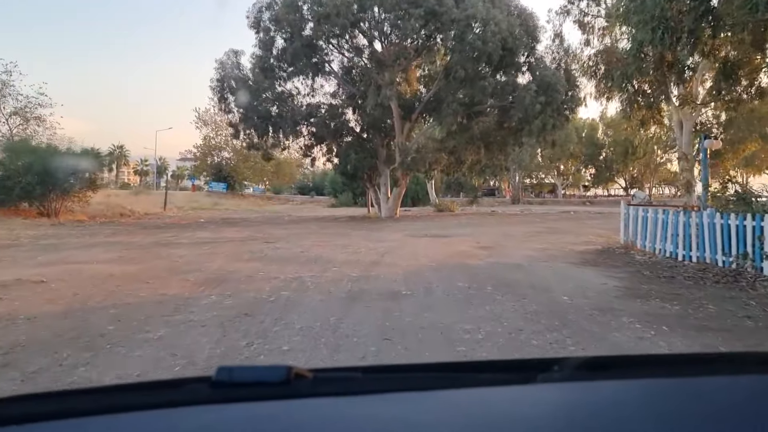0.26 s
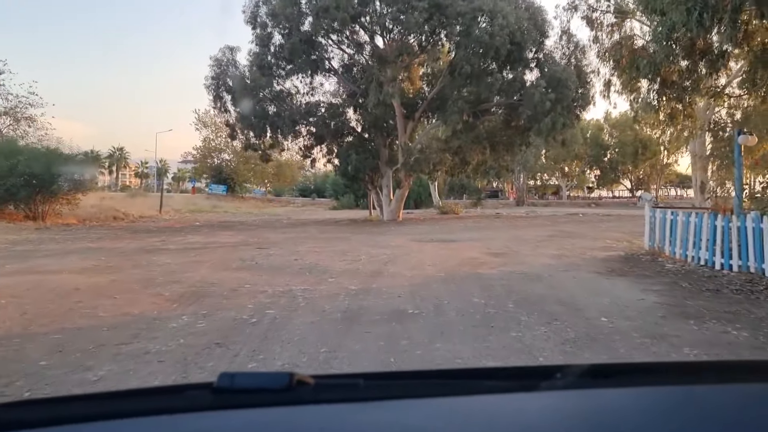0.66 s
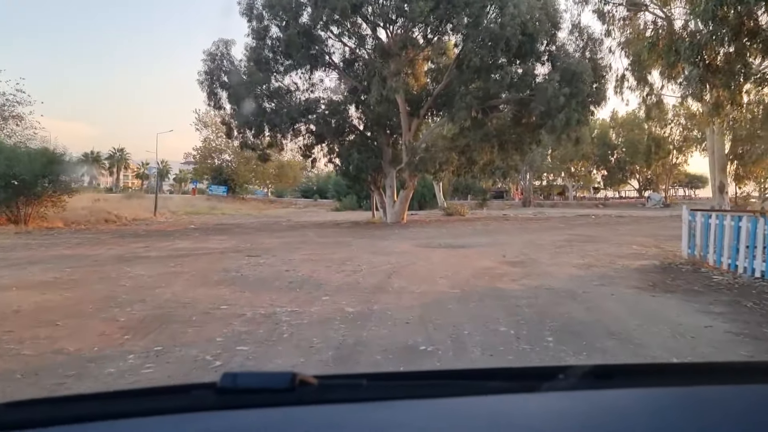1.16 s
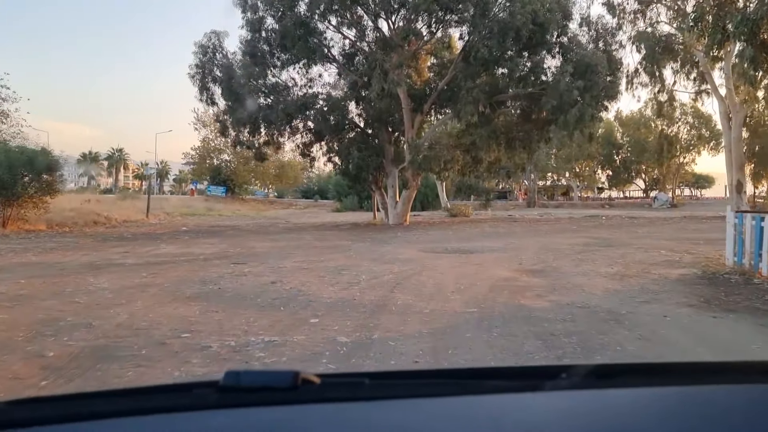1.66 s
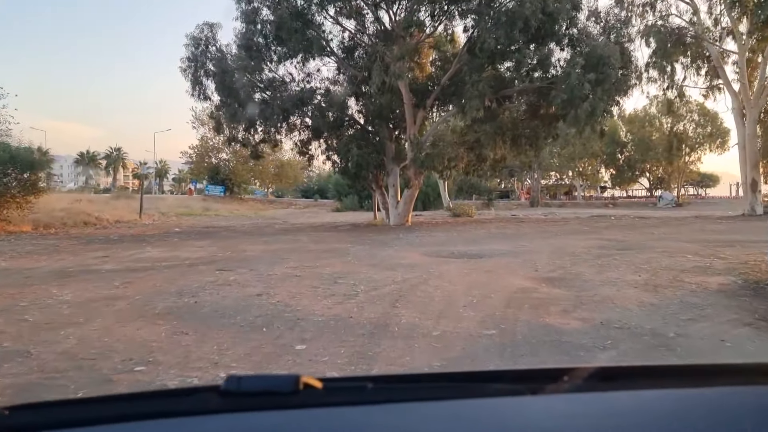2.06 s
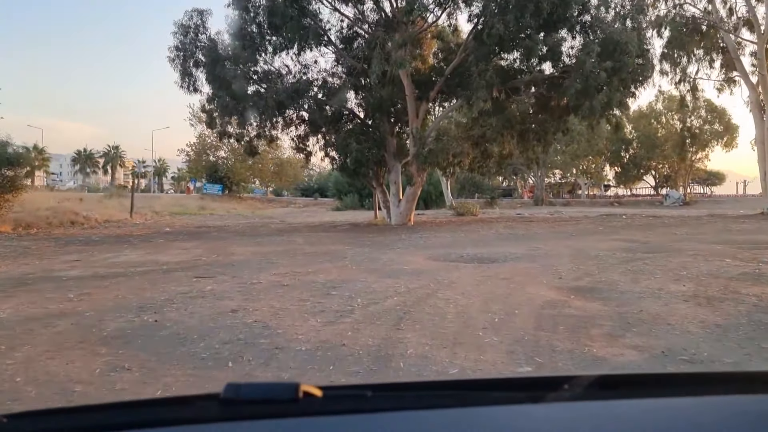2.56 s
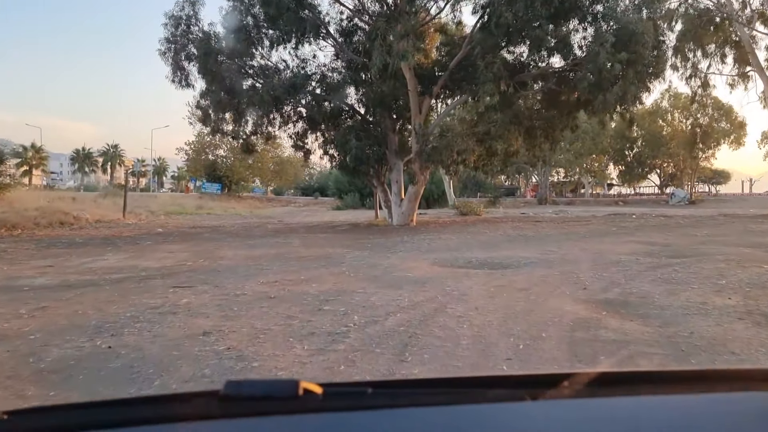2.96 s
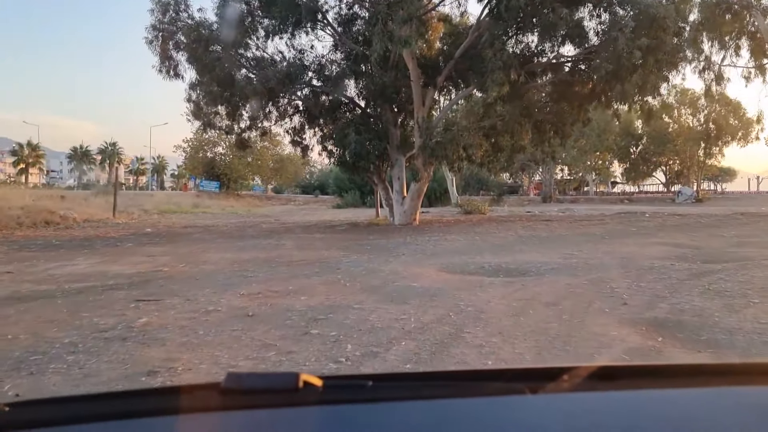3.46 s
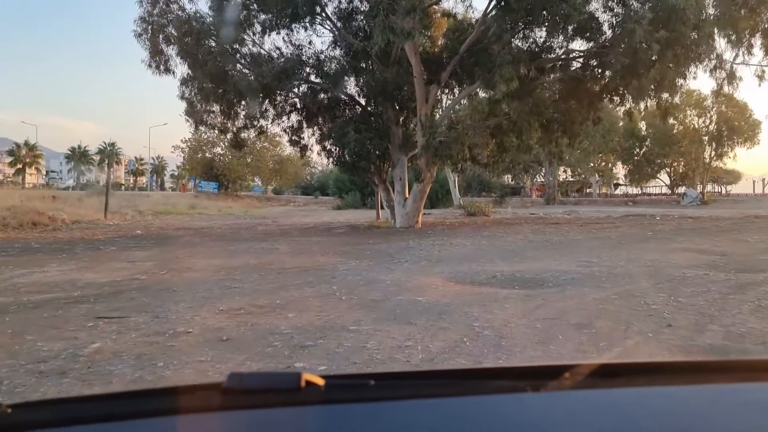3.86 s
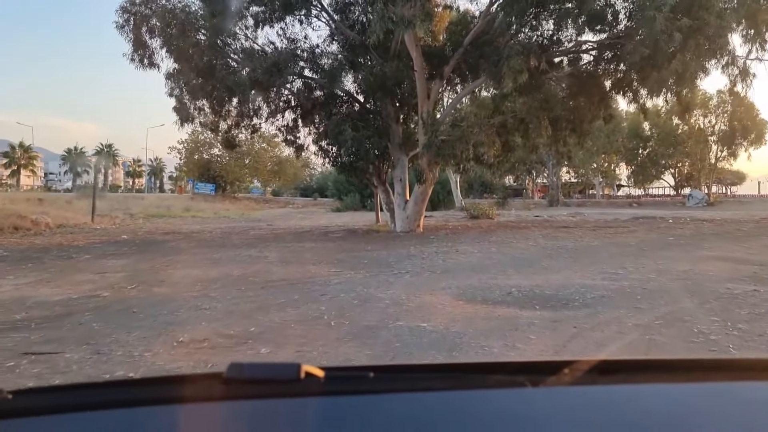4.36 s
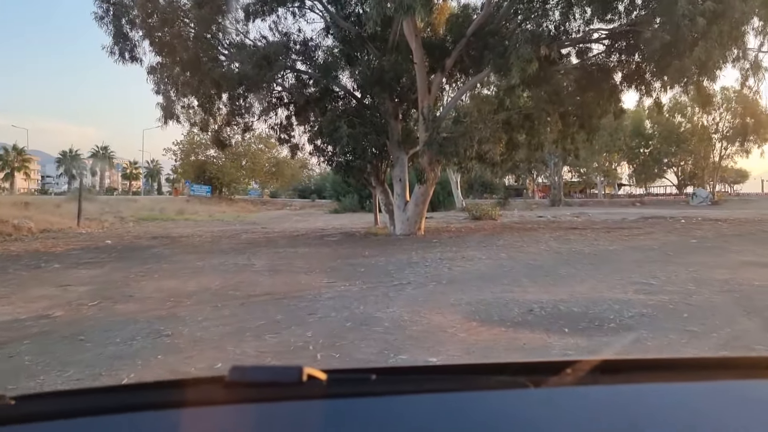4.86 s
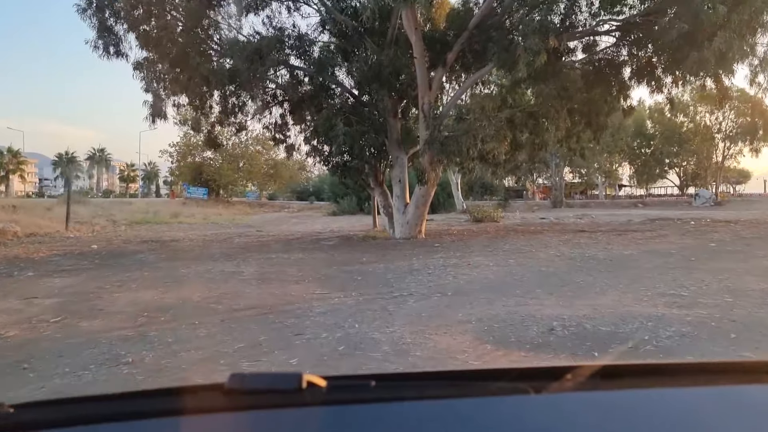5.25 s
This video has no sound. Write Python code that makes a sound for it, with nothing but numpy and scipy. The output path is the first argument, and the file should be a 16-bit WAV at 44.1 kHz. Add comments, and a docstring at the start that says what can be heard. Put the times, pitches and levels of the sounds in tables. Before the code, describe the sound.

Heard from the dashboard inside a slowly rolling car, low tyre rumble and uneven bassy booms run throughout. Stones knock and tick dully under the floor, densest in the first two seconds, with a sharp tick near 1.3 seconds and a firm knock near 3.1. Faint thin hums glide underneath later, while a soft hiss with grit swells towards the end.

```python
"""A small car rolls slowly over a stony lot, heard by a two-port microphone on the dashboard.
Bumps make three cabin resonances boom as wandering sines, and the tyres rumble through the body as shaped noise.
Stones knock and tick under the floor as cracks, rings and noisy tails; small stones and grit clink as short rings.
A faint hum glides as thin tones, and a hiss from the left, also shaped noise, grows towards the end."""
import sys
import numpy as np
from scipy import signal
from scipy.fft import rfft, irfft
from scipy.io import wavfile
from scipy.ndimage import uniform_filter1d

SR = 44100
rng = np.random.default_rng(int(sys.argv[2]) if len(sys.argv) > 2 else 0)


def to_wav(sig):
    """Store sig (one row per channel, or 1-D mono) as 16-bit WAV at the path in sys.argv[1].

    Samples outside -1..1 are clipped; the rate is SR.
    """
    pcm = np.clip(np.atleast_2d(sig), -1, 1) * 32767
    pcm = np.round(pcm).astype(np.int16)
    wavfile.write(sys.argv[1], SR, pcm.T)  # frames by channels


def voltage_ratio(level):
    """Linear amplitude factor for a level in decibels (scalar or array-like)."""
    return 10 ** (np.asarray(level, float) / 20)


N = 242726
TIME = np.arange(N) / SR


def evened(x):
    """Scales a signal to rms 1."""
    return x / np.sqrt(np.mean(x ** 2) + 1e-20)


def slow_random(count, span):
    """A random curve of rms 1, smoothed twice over span points."""
    once = uniform_filter1d(rng.standard_normal(count), span)
    return evened(uniform_filter1d(once, span))


def sides(pan_db):
    """Gains of the left and right port for a left-right difference in dB."""
    return voltage_ratio(np.array([[pan_db / 2], [-pan_db / 2]]))


def read(points, hz):
    """Reads a table over frequency at the frequencies hz."""
    f, value = np.transpose(points)
    return np.interp(np.log(hz + 1), np.log(f + 1), value)


def curves(rows, t):
    """Reads each column of a table over time at the times t."""
    s, *columns = np.transpose(rows)
    return [np.interp(t, s, column) for column in columns]


def modes(table, hz, order):
    """Strength over frequency of a set of resonances."""
    return np.sqrt(sum(voltage_ratio(db) ** 2 / (1 + (2 * (hz - f) / width) ** 2) ** order for f, width, db in table))


def rise(t, rise_s):
    """A soft start from 0 to 1."""
    return 1 - np.exp(-(t / rise_s) ** 2)


# peaks and dips of the cabin at each port: f/Hz, width/Hz, left level/dB, right level/dB
CABIN = [(79, 38, 0, 6), (221.8, 43, 6.5, 1.5), (338, 130, 4, 1), (1220, 150, -2, -4.5),
         (570.3, 130, 7, 7.5), (735, 45, 2.5, -4), (1010, 38, 6.5, 4), (1387, 280, 3, 5.5),
         (1800, 65, 5, 0), (1880, 670, 3, -0.5), (2410, 140, -5, 4), (2770, 110, -2.5, -3),
         (3220, 140, 4, -2), (4580, 310, 1.5, 1), (6700, 1500, 5, 2.5)]


def ports(hz, same, lead, balance):
    """Likeness, phase turn and gains of the two ports; the cabin colours each in its own way."""
    likeness = np.clip(read(same, hz), 0, 1)
    turn = np.exp(-1j * np.interp(hz, *np.transpose(lead)))
    left, right = voltage_ratio(read(balance, hz) / 2), voltage_ratio(-read(balance, hz) / 2)
    # what is left when the ports are summed
    mean = np.sqrt(left ** 2 + right ** 2 + 2 * likeness * turn.real) / 2
    peaks = np.array([np.exp(-(2 * (hz - f) / width) ** 2) for f, width, *_ in CABIN])
    left_db, right_db = np.transpose(CABIN)[2:] @ peaks
    left, right = left * voltage_ratio(left_db) / mean, right * voltage_ratio(right_db) / mean
    return likeness[:, None], turn[:, None], left[:, None], right[:, None]


def noise(shape_db, pair, patchy_db, flicker_db, size):
    """Stereo noise from random short-time spectra, with patches and a flicker shared by all pitches."""
    hop = size // 4
    hz, t = np.fft.rfftfreq(size, 1 / SR), np.arange(N // hop + 5) * hop / SR
    a, b, c, d, patches = rng.standard_normal((len(t), len(hz), 5)).T
    patches = uniform_filter1d(patches, size=size // 200, axis=0)
    patches = evened(uniform_filter1d(patches, size=32768 // size, axis=1))
    flicker = evened(uniform_filter1d(rng.standard_normal(len(t)), size=4))
    same, turn, left, right = ports(hz, *pair)
    shared, separate = a + 1j * b, c + 1j * d
    z = np.array([left * shared, right * turn * (same * shared + np.sqrt(1 - same ** 2) * separate)])
    z *= voltage_ratio(shape_db(hz[:, None], t) + patchy_db * patches + flicker_db * flicker)
    return signal.istft(z, nperseg=size, noverlap=size - hop)[1][:, :N]


def tone(hz, db, wander_hz, smooth_s):
    """A sine whose frequency wanders at random about the curve hz."""
    drift = slow_random(N, int(smooth_s * SR))
    turns = np.cumsum(hz + wander_hz * drift) / SR + rng.random()
    return np.sqrt(2) * voltage_ratio(db) * np.sin(2 * np.pi * turns)


# two faint gliding hums: t/s, f/Hz, level/dB
HUM_FALLING = [(2.25, 250.5, -46), (2.6, 246.5, -59), (2.9, 239.8, -52), (3.5, 229.8, -47),
               (4.0, 223.4, -54.5), (4.45, 222.4, -49)]
HUM_LEVEL = [(3.601, 248.7, -55.5), (4.303, 240.8, -52.5), (5.001, 246.9, -53), (5.5, 244.6, -55.5)]


def hums():
    """Two thin gliding tones that fade in and out."""
    out = 0
    for rows in (HUM_FALLING, HUM_LEVEL):
        on = np.clip(np.minimum(TIME - rows[0][0], rows[-1][0] - TIME) / 0.034, 0, 1)
        out = out + on * tone(*curves(rows, TIME), wander_hz=0.38, smooth_s=0.035)
    return out


# the hiss, before tilt and lifts change its strength:
# t/s, level/dB, brightness/dB per octave, lift near 6.4 kHz/dB
HISS = [(0.0, -58.5, -5.5, 2.5), (0.61, -61.5, -5.5, 0.5), (1.39, -56.5, 0, 1), (1.98, -57.5, -4, -3),
        (3.02, -52.5, 0, -3), (3.3, -54, -1, -2.5), (3.57, -53, -1, -3), (3.85, -51.5, .5, -2.5),
        (3.97, -48.5, 1, -8), (4.24, -47, -1, -4.5), (4.55, -47.5, -0.5, 4), (4.85, -47, -0.5, 1),
        (5.1, -46.5, 0, 6), (5.3, -47, 1.5, 3), (5.5, -43.5, 0, 7)]
# basic colour of the hiss: f/Hz, level per Hz/dB
HISS_COLOUR = [(240, -31.5), (450, -4.5), (900, -12), (1800, -12), (2600, -9.5), (4100, -17), (4600, -27),
               (6500, -33.5), (7600, -33.5), (8700, -46), (11300, -60.5), (19200, -120)]
# a band of the hiss that stands out and moves: t/s, centre f/Hz, half width/octaves, lift/dB
HISS_BAND = [(3.6, 1900, 0.2, 3), (4.0, 1510, 0.18, 3), (4.25, 1800, 0.095, 4), (4.5, 1800, 0.085, 6.5),
             (4.7, 1835, 0.079, 3.5), (4.96, 1780, 0.043, 8.5), (5.0, 2503, 0.067, 2), (5.2, 2640, .08, 7),
             (5.35, 2920, 0.14, 3.5), (5.5, 2850, 0.28, 2.5)]
# bands that stand out (or sink) more as the hiss swells: f/Hz, half width/Hz, lift/dB per dB of swell
HISS_SWELL_BANDS = [(1046, 39, .5), (5000, 79, 0.5), (5400, 550, -0.27)]
# how alike the two ports hear the hiss: f/Hz, likeness/0-1
HISS_SAME = [(500, 1), (1500, 0.49), (2500, 0.69), (3500, 0.24), (4500, 0.19), (6000, 0.4), (8000, 0.33)]
# how far the left port leads: f/Hz, phase/radians
HISS_LEAD = [(0, 0.89), (500, 1.97), (1300, 2.6), (2000, 2.76), (2500, 4.65), (3600, 5.16), (4500, 6.8),
             (5500, 9.9), (6500, 11.2), (7500, 12.2), (8500, 13)]
# left-right difference, before the cabin colours it: f/Hz, level/dB
HISS_BALANCE = [(60, -5.5), (160, 6), (430, 13.5), (1150, 0), (3090, 0.5), (8270, 4.5)]
HISS_QUIET_DB = -61  # swell is counted from this level


def hiss():
    """Wide noise that swells and changes brightness; the left port leads in phase."""
    def shape(hz, t):
        """Colour, tilt, top and the bands, in dB."""
        centre_hz, octaves, lift_db = curves(HISS_BAND, t)
        moving_db = lift_db * np.exp(-(np.log2(hz / centre_hz + 1e-3) / octaves) ** 2)
        level_db, tilt_db, top_db = curves(HISS, t)
        bands = sum(share * np.exp(-((hz - f) / width) ** 2) for f, width, share in HISS_SWELL_BANDS)
        swell_db = bands * np.maximum(level_db - HISS_QUIET_DB, 0)
        tilted_db = read(HISS_COLOUR, hz) + tilt_db * np.log2(hz / 2000 + 0.087)
        return tilted_db + top_db * np.exp(-((hz - 6400) / 800) ** 2) + moving_db + swell_db
    x = noise(shape, (HISS_SAME, HISS_LEAD, HISS_BALANCE), patchy_db=1.3, flicker_db=0.77, size=1024)
    return x / np.std(x.mean(0)) * voltage_ratio(curves(HISS, TIME)[0])


# short clinks, low to high: small stones and grit ringing on the bodywork:
# t/s, f/Hz, level before rise, fade and scrape/dB
CLINKS = [(0.232, 3140, -53.5), (0.238, 1770, -48), (0.58, 6300, -78), (1.529, 4200, -57),
          (0.734, 7040, -70), (1.98, 3220, -57), (1.995, 3220, -52.5), (2.018, 3140, -56),
          (2.002, 4550, -56.5), (2.955, 7200, -69), (2.971, 4490, -53.5), (2.973, 7760, -61.5),
          (3.121, 6700, -69), (3.949, 1347, -45), (3.976, 1504, -48), (3.891, 6850, -71),
          (3.968, 6700, -65), (4.049, 7100, -67), (4.504, 6950, -61)]
# random grit: level against the hiss, spread per e-fold of chance, lowest pitch, range, dB per octave up
GRIT_DB, GRIT_SPREAD_DB, GRIT_LOW_HZ, GRIT_OCTAVES, GRIT_TILT_DB = -16.5, 4.5, 595.6, 3.4, -4.5
# scrape: noisy share that widens the ring
CLINK_RISE_S, CLINK_T60_S, CLINK_SCRAPE = 0.00053, 0.066, 0.59


def clinks():
    """Short single rings: the clear ones from the table, and a spray of grit that follows the hiss."""
    at, size, pitch, pan = rng.random((900, 4)).T
    s, octaves = at * TIME[-1], GRIT_OCTAVES * pitch
    spread_db = -GRIT_SPREAD_DB * np.log(size + 0.0068)
    db = curves(HISS, s)[0] + GRIT_DB + spread_db + GRIT_TILT_DB * octaves
    grit = zip(s, GRIT_LOW_HZ * 2 ** octaves, db, 10 * pan - 3)
    t, out = np.arange(2048) / SR, np.zeros((2, N + 2048))
    fade = (1 - np.exp(-t / CLINK_RISE_S)) * voltage_ratio(-60 * t / CLINK_T60_S)
    for s, hz, db, pan_db in [(*row, 1.5) for row in CLINKS] + list(grit):
        scrape = slow_random(2048, int(2.5 * SR / hz))
        ring = voltage_ratio(db) * fade * (1 + CLINK_SCRAPE * scrape) * np.sin(2 * np.pi * hz * t)
        out[:, round(s * SR):][:, :2048] += ring * sides(pan_db)
    return out[:, :N]


# resonances that colour the knock, tick and ping of a stone: f/Hz, width/Hz, level/dB
KNOCK = [(730, 960, -0.5), (1200, 690, 0.5), (1650, 1900, -3)]
TICK = [(2060, 370, -9.5), (2555, 190, 6.5), (3003, 770, 0.5), (3780, 2100, -7.5)]
PING = [(4260, 850, -3), (5070, 470, 4.5), (5850, 1500, -5.5), (7530, 1000, -13)]
# how alike the two ports hear stones and tyres: f/Hz, likeness/0-1
ROAD_SAME = [(30, .99), (70, .995), (150, .95), (220, .8), (330, 0.1), (700, 0.99), (1200, 0.74),
             (2000, .5), (3000, 0.8), (6000, 1.0)]
# how far the left port leads: f/Hz, phase/radians
ROAD_LEAD = [(80, 0.25), (260, 0.18), (520, 3), (1900, 3.92), (3400, 4.64)]
# left-right difference, before the cabin colours it: f/Hz, level/dB
ROAD_BALANCE = [(60, 1.5), (160, 4), (430, -0.5), (1150, -0.5), (3090, -3.5), (8270, -3.5)]
HARD_DB, SOFTEN_DB = -26, 24.5  # hardest blow; one this much weaker touches twice as long
SHORTEN = 0.7  # weak blows die sooner
DETUNE = 0.08  # weak blows land elsewhere on the panel and shift its modes
BOUNCE_DB, BOUNCE_S = -5, 0.04  # small stones skitter on: limit of strength, longest delay
FADE_BEND = 1.27  # above 1 the tail holds, then drops
RING_DB, RING_T60_S, TAIL_DB = -2.5, 0.023, -2.5  # the upper modes ring over the noisy tail
# the crack is a touch and a firmer second touch
CRACK_DB, TICK_CRACK_DB, RETOUCH_S, RETOUCH = 7, -9, 0.0016, 1.3


def blow(knock_db, tick_db, ping_db, t60_s, pan_db):
    """One stone: a crack in the lower panel modes, a ring in the upper and a noisy tail; weak ones skitter."""
    hz, t = np.fft.rfftfreq(4096, 1 / SR), np.arange(4096) / SR
    soft = 2 ** np.clip((HARD_DB - max(knock_db, tick_db, ping_db)) / SOFTEN_DB, 0, 3)
    same, turn, left, right = (v[:, 0] for v in ports(hz, ROAD_SAME, ROAD_LEAD, ROAD_BALANCE))
    both = np.array([left, right * turn])
    z = rfft(rng.standard_normal((2, 4096)))
    z = both * np.array([z[0], same * z[0] + np.sqrt(1 - same ** 2) * z[1]])

    def fade(u, rise_s):
        """Soft start and bent decay."""
        return rise(u, rise_s * soft) * voltage_ratio(-60 * (u * soft ** SHORTEN / t60_s) ** FADE_BEND)

    # resonances, level/dB, rise/s: the highs build up last
    parts = (KNOCK, knock_db, 0.0009), (TICK, tick_db, 0.0012), (PING, ping_db, 0.0025)
    hops = np.maximum(t - BOUNCE_S * rng.uniform(0.41, 1, (2, 1)), 0)  # two later touches
    bounce = (1 - 1 / soft) * voltage_ratio(BOUNCE_DB)
    shift = 1 + DETUNE * (soft - 1) * rng.uniform(-0.79, 1)
    tail, ring = 0, 0
    for table, db, rise_s in parts:
        grain = evened(irfft(z * modes(table, hz, order=2)))
        tail = tail + voltage_ratio(db) * grain * (fade(t, rise_s) + bounce * fade(3 * hops, rise_s).sum(0))
    for table, db, rise_s in parts[1:]:
        for f, _, mode_db in table:
            ring = ring + voltage_ratio(db + mode_db) * np.sin(2 * np.pi * f * shift * t) * rise(t, rise_s * soft)
    ring = ring * voltage_ratio(RING_DB - 60 * t / RING_T60_S)
    tail = voltage_ratio(TAIL_DB) * tail + irfft(both * rfft(ring))

    colour = modes(KNOCK, hz, order=1) + voltage_ratio(tick_db - knock_db - 1.5) * modes(TICK, hz, order=2)
    # the crack peaks just after the touch, and is dull
    touches = np.exp(-2j * np.pi * hz * 0.0010) * (1 + RETOUCH * np.exp(-2j * np.pi * hz * RETOUCH_S))
    dull = 1 / (1 + (hz / 3500) ** 6)
    crack = irfft(both * colour * touches * dull) * rise(t, 0.0012) * np.exp(-(t / 0.0037) ** 2)
    crack_db = max(knock_db, tick_db + TICK_CRACK_DB) + CRACK_DB
    crack *= voltage_ratio(crack_db) / soft ** 1.3 / abs(crack.mean(0)).max()
    return (tail + crack) * sides(pan_db)


# stones on the floor pan, levels before each part is shaped:
# t/s, knock level/dB, tick level/dB, ping level/dB, added left-right level/dB
STONES = [(0.046, -45, -48, -53, 5), (0.233, -40.5, -49, -61, 3.5), (0.243, -44, -60, -58, 2.5),
          (0.262, -46, -63, -63, 4), (0.422, -56, -74, -86, 7), (0.498, -54, -59, -53, -0.5),
          (0.507, -45, -64, -70, 5), (0.577, -45, -49.5, -76, 3.5), (0.6584, -41, -48, -70.5, 0),
          (0.678, -44, -52, -56.5, 2), (0.94, -44, -54.5, -64, -2.5), (0.963, -41, -52, -68, 2),
          (1.063, -53, -44.5, -64, 5.5), (1.075, -48, -53, -58.5, -7), (1.258, -48.5, -65.5, -72, 10.5),
          (1.319, -57, -35, -42, 1.5), (1.3235, -65, -30.5, -43, 3), (1.509, -45.5, -75, -67, -9.5),
          (1.528, -41, -55, -59, 1), (1.826, -47, -57, -56, 1), (1.962, -44, -65, -68, -2.5),
          (1.983, -44.5, -59, -54, 4.5), (2.412, -44, -65, -80, 5.5), (3.0934, -32, -46.5, -73, 1.5),
          (3.118, -43.5, -46, -72, 6.5), (3.954, -40.5, -48, -65, 1), (4.378, -40.5, -59, -69, 1.5),
          (4.676, -34.5, -45, -60, 2), (5.159, -42.5, -55, -55, 0)]
STONE_T60_S = 0.052  # for the hardest blow
SCATTER_CAP = 0.09  # keeps the scattered stones small


def stones():
    """Stones struck on the floor: the loud ones from the table, and a random scatter of small ones."""
    out = np.zeros((2, N + 4096))
    for s, knock_db, tick_db, ping_db, pan_db in STONES:
        out[:, round(s * SR):][:, :4096] += blow(knock_db, tick_db, ping_db, STONE_T60_S, pan_db)
    for at, size, bright, pan in rng.random((70, 4)):
        db = -62 - 7.3 * np.log(size + SCATTER_CAP)
        small = blow(db, db - 3.0 - 12 * bright, db - 7.5 - 14 * bright, 0.033, 6 * pan - 3)
        out[:, int(at * N):][:, :4096] += small
    return out[:, :N]


# tyre load on the rough ground, before thuds, sway and bumps: t/s, rumble level/dB, boom level/dB
ROLL = [(0.0, -31.5, -32), (0.4, -32.5, -27.5), (0.9, -32, -29.5), (1.35, -32, -29.5), (1.94, -35, -32.5),
        (2.4, -34, -31), (2.9, -35.5, -30.5), (3.3, -35.5, -33.5), (3.68, -34.5, -40), (3.9, -34.5, -32),
        (4.45, -35.5, -32.5), (4.85, -33.5, -40.5), (5.2, -35, -34.5), (5.5, -33, -39.5)]
# colour of the rumble: f/Hz, level per Hz/dB
RUMBLE_COLOUR = [(12, -31.5), (20, -7), (33, 0), (47, -12), (71, -2.5), (116, -10), (161, -17.5),
                 (230, -23.5), (382, -34), (518, -36), (686, -50), (1110, -47), (1760, -50), (3150, -57.5),
                 (7490, -78.5), (8720, -88.5), (11300, -123)]
# dull thuds, brief swells of the rumble: t/s, lift/dB
THUDS = [(0.07, 3), (0.449, 2), (1.191, 4), (1.419, 5.5), (2.869, 6.5), (3.351, 5.5), (4.301, 7.5),
         (5.181, 7)]
THUD_S, THUD_HZ, THUD_OCTAVES = 0.046, 196, 0.8  # half length, centre, half width


def rumble():
    """Tyres on loose ground, carried in by the body: low noise with dull thuds."""
    def shape(hz, t):
        """Colour and thuds, in dB."""
        thuds_db = sum(db * np.exp(-((t - s) / THUD_S) ** 2) for s, db in THUDS)
        thud_band = np.exp(-(np.log2((hz + 1) / THUD_HZ) / THUD_OCTAVES) ** 2)
        return read(RUMBLE_COLOUR, hz) + thuds_db * thud_band
    x = noise(shape, (ROAD_SAME, ROAD_LEAD, ROAD_BALANCE), patchy_db=1.0, flicker_db=0.7, size=4096)
    # the level is set by the band from 78 to 400 Hz
    band = signal.sosfilt(signal.butter(4, (78, 400), "bandpass", fs=SR, output="sos"), x.mean(0))
    return x / np.std(band) * voltage_ratio(curves(ROLL, TIME)[0])


# the three lowest cabin resonances: level above the rolling boom/dB, left-right level/dB
BOOM = [(1, -0.5), (0.5, -0.1), (-13.5, 1.5)]
# pitch of each boom: low and middle wander, the top one is near 104 Hz, then mostly near 88 Hz from 3.8 s
# and higher again at the end: t/s, low f/Hz, middle f/Hz, top f/Hz
BOOM_PITCH = [(0.301, 39.37, 59.55, 104), (0.62, 42.1, 65.75, 104.9), (0.859, 41, 57.05, 103.2),
              (1.638, 42.4, 59.66, 103.2), (2.33, 43.17, 61.98, 106), (2.6, 41.38, 59.65, 103.5),
              (3.2, 42.16, 55.4, 99.8), (3.45, 41.64, 59.8, 105.7), (3.799, 39, 57.58, 87.2),
              (4.0, 31.7, 61.56, 88.2), (4.25, 33, 56.76, 90.33), (4.421, 41.38, 61.85, 95),
              (5.1, 45.13, 59.97, 100)]
# the wheels hit a bump: t/s, length/s, low level/dB, middle level/dB, top level/dB
BUMPS = [(0.121, 0.08, -28, -19.5, -27.5), (0.409, 0.08, -22.5, -29.5, -28.5), (0.63, 0.058, -31, -44, -29),
         (0.87, 0.25, -21, -31.5, -36.5), (1.08, 0.16, -20, -22, -31.5), (1.503, 0.12, -17, -28, -32),
         (1.718, 0.08, -23.5, -24, -33.5), (1.951, 0.16, -26, -21, -46), (2.26, 0.039, -32, -20, -55),
         (2.579, 0.13, -20, -21, -35), (2.93, 0.16, -36.5, -29, -38), (3.4, 0.11, -24, -46, -31.5),
         (3.56, 0.13, -26.5, -27, -45), (3.8, 0.15, -27, -31.5, -30), (4.02, 0.049, -23, -32, -45),
         (4.34, 0.068, -27.5, -39.5, -31), (4.619, 0.12, -50, -31, -50.5), (5.049, 0.091, -41, -25, -30.5),
         (5.149, 0.077, -27, -29, -33.5), (5.48, 0.064, -47, -22.5, -42)]
BOOM_SWAY_DB, BOOM_SWAY_S = 3.2, 0.07  # small unevenness: each resonance swells and fades at random
BOOM_LEAD_S = 0.0009  # the left port hears the boom a little earlier


def boom():
    """Three cabin resonances, shaken all the time by the ground and harder by each bump."""
    s, length, *bump_db = np.transpose(BUMPS)
    t, span, out = TIME[::64], int(BOOM_SWAY_S * SR / 64), 0
    swell = np.exp(-(2 * (t[:, None] - s) / length) ** 2)
    for hz, (lift_db, pan_db), peak_db in zip(curves(BOOM_PITCH, TIME), BOOM, bump_db):
        rolling_db = curves(ROLL, t)[1] + lift_db + BOOM_SWAY_DB * slow_random(len(t), span)
        power = voltage_ratio(rolling_db) ** 2 + swell ** 2 @ voltage_ratio(peak_db) ** 2
        level_db = np.interp(TIME, t, 10 * np.log10(power))
        out = out + tone(hz, level_db, wander_hz=1.514, smooth_s=0.048) * sides(pan_db)
    return np.array([out[0], np.interp(TIME - BOOM_LEAD_S, TIME, out[1])])


def scene():
    """Everything in the cabin, with soft ends."""
    ends = np.clip(np.minimum(TIME, TIME[::-1]) / 0.004, 0, 1)
    return ends * (hums() + hiss() + clinks() + stones() + rumble() + boom())


def low_pass(x):
    """Removes everything above the highest recorded frequency."""
    return signal.sosfilt(signal.butter(12, 16000, fs=SR, output="sos"), x)


def record(dry):
    """Takes the finished mix to its final form."""
    return low_pass(dry)


dry = scene()
out = record(dry)
to_wav(out)
```